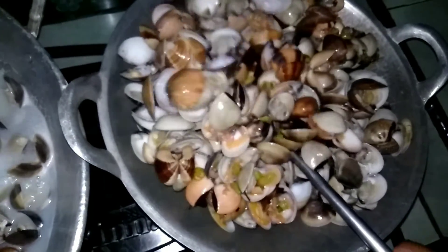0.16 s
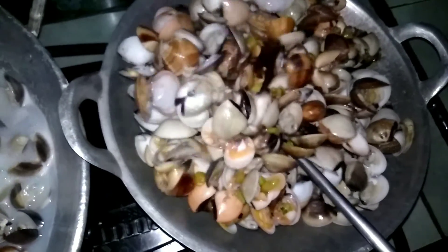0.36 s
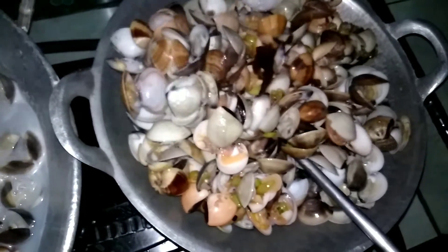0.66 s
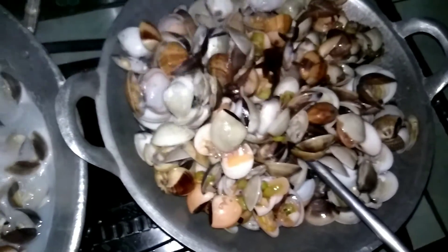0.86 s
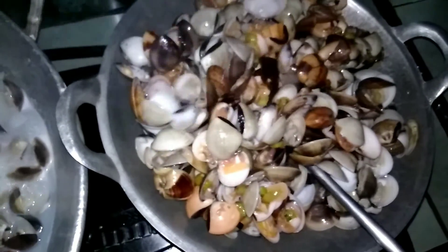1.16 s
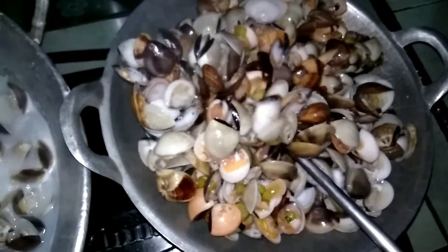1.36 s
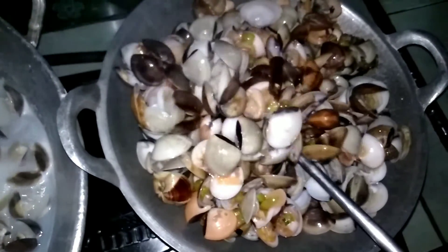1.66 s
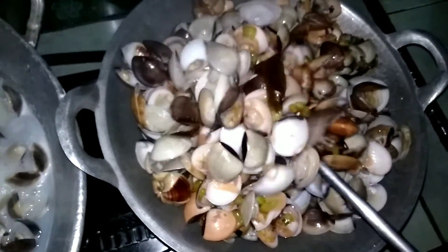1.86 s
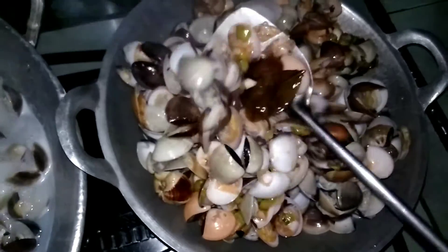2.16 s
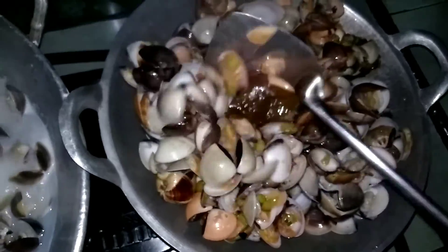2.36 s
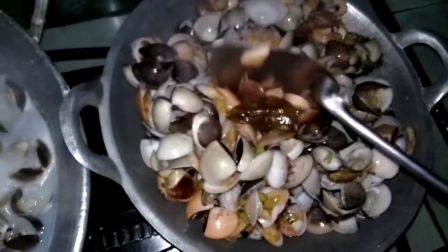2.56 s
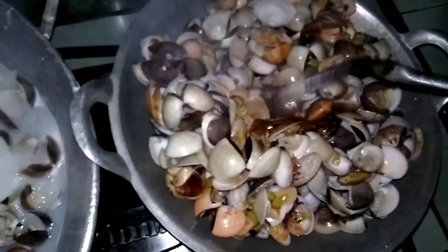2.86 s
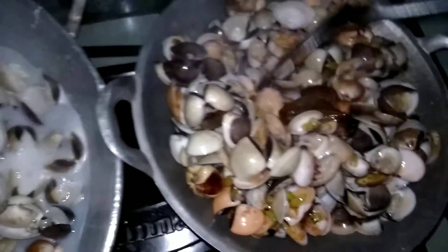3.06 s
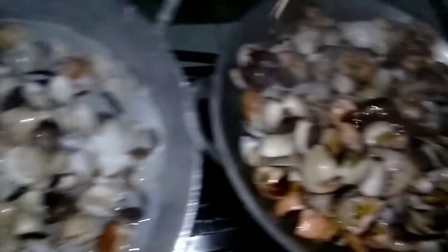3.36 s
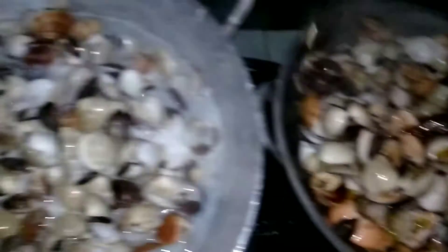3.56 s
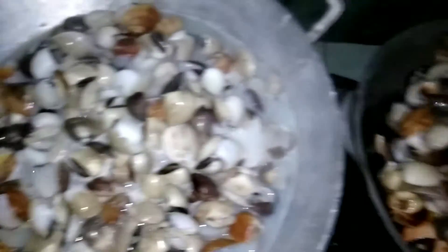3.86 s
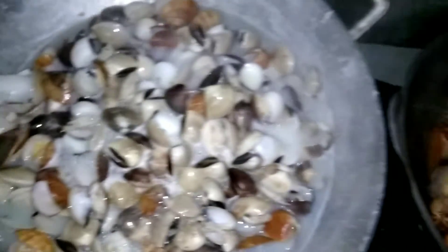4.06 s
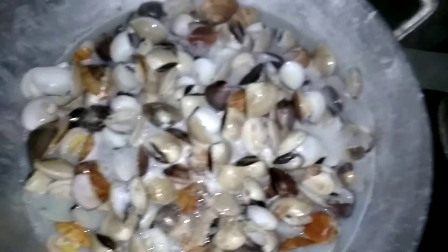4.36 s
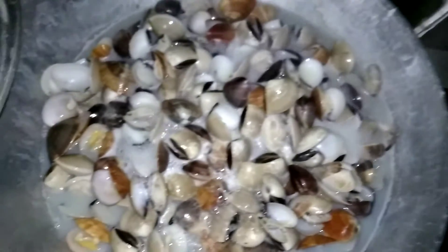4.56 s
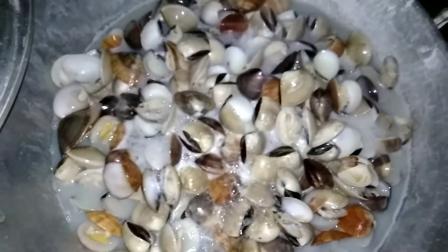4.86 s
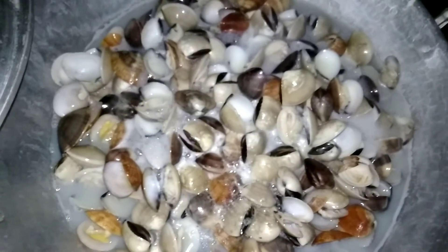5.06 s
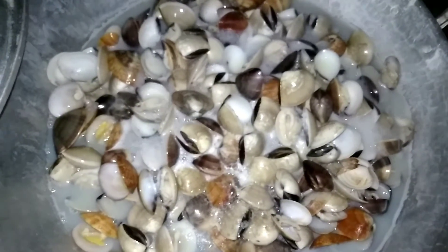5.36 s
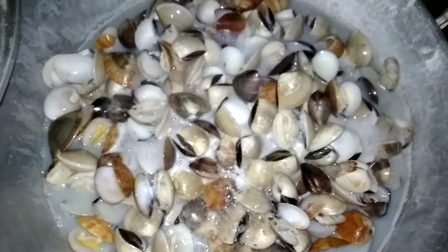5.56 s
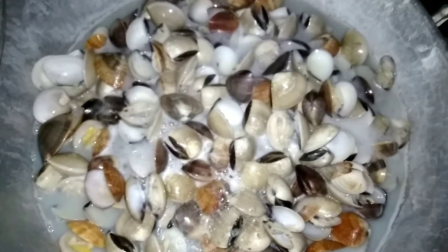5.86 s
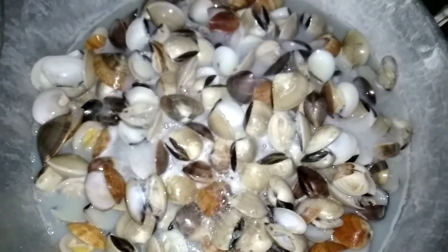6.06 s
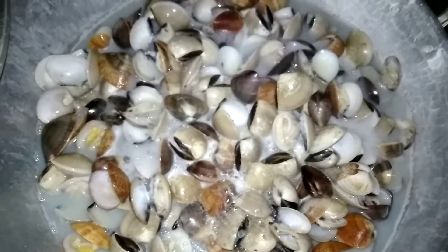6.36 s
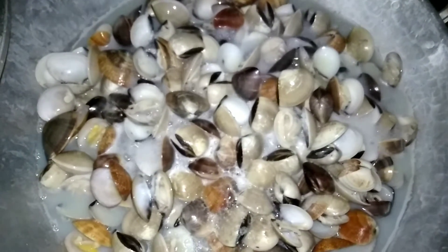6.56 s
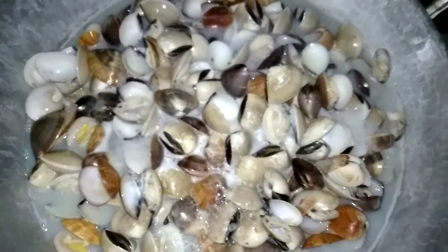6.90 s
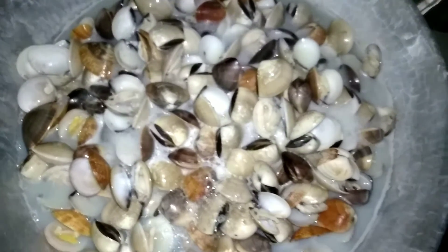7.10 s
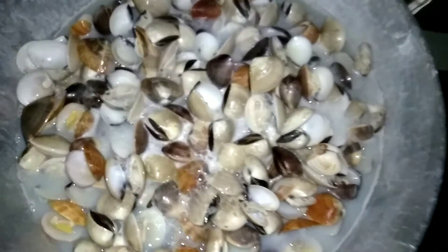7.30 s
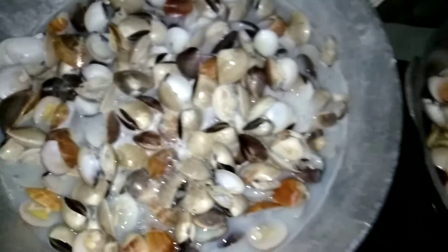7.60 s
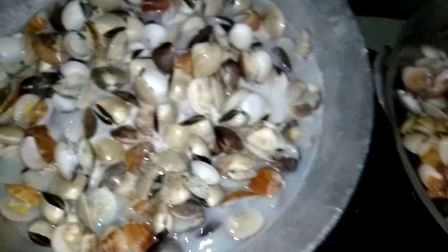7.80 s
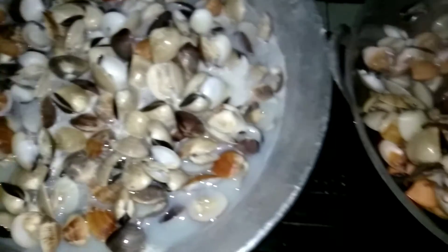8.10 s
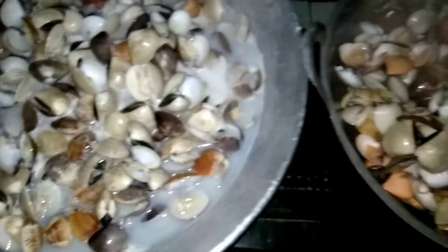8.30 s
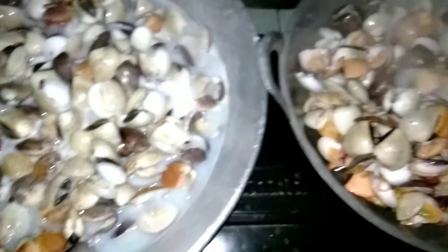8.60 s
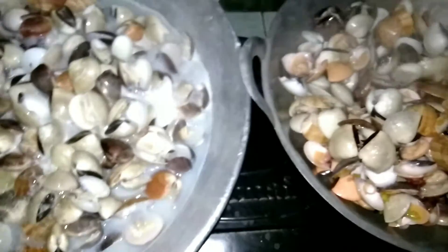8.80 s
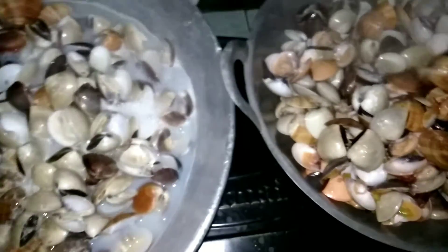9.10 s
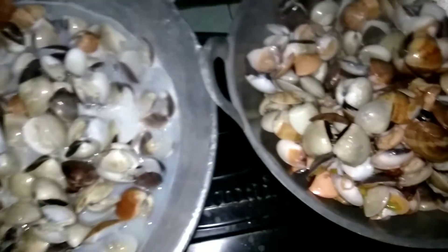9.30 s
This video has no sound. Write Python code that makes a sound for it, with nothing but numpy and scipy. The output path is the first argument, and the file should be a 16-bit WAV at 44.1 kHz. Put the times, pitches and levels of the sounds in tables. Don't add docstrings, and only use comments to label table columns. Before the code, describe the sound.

Clam shells clatter against each other and a steel pan as they are stirred, sparse at first, then dense, above a softly hissing burner.

```python
import sys
import numpy as np
from scipy import signal
from scipy.fft import rfft, irfft, next_fast_len
from scipy.io import wavfile
from scipy.ndimage import uniform_filter1d, map_coordinates

SR = 44100
rng = np.random.default_rng(int(sys.argv[2]) if len(sys.argv) > 2 else 0)


def wav_record(signal):
    frames = np.transpose(np.atleast_2d(signal))
    bounded = np.clip(frames, -1, 1)
    quanta = np.round(bounded * 32767).astype(np.int16)
    wavfile.write(sys.argv[1], SR, quanta)


def level_to_linear(level):
    exponent = np.asarray(level, float) / 20
    return 10 ** exponent


N = 416304


def unit(x):
    return x / np.sqrt(np.mean(x ** 2) + 1e-20)


def along(points, hz):
    f, v = np.transpose(points)
    return np.interp(np.log(hz + 1), np.log(f + 1), v)


def curves(rows):
    s, *columns = np.transpose(rows)
    return [np.interp(np.arange(N) / SR, s, column) for column in columns]


def filtered(x, response):
    m = next_fast_len(N + 8192)
    return irfft(rfft(x, m) * response(np.fft.rfftfreq(m, 1 / SR)), m)[..., :N]


def coloured(x, spectrum):
    size = 4096
    gain = level_to_linear(along(spectrum, np.fft.rfftfreq(size, 1 / SR)))
    cepstrum = irfft(np.log(gain / np.sqrt(np.mean(gain ** 2)) + 1e-4))
    cepstrum[1:size // 2] *= 2
    cepstrum[size // 2 + 1:] = 0
    impulse = irfft(np.exp(rfft(cepstrum)))
    return signal.oaconvolve(x, impulse[None], axes=1)[:, :N]


def strikes(s, db, hz, ring_t60, burst_t60, ring_db, length, rough, rise=0.00021, crack=1.18):
    t = np.arange(round(length * SR)) / SR
    draw = rng.standard_normal((len(s), 2, 8))
    chatter = rng.standard_normal((len(s), 2, len(t)))
    life = np.clip(np.reshape(burst_t60, (-1, 1, 1)), .004, .12)
    contact = crack * level_to_linear(-60 * t / .005)

    dull = np.clip(1.6 - 1.6 * hz / 8870, 0, 1)[:, None, None]
    body = chatter
    for _ in range(2):
        body = (body + dull * np.roll(body, 1, axis=2)) / np.sqrt(1 + dull ** 2)
    wave = body * (level_to_linear(-60 * (t / life) ** 1.6) + contact)

    fade = level_to_linear(ring_db - 60 * t / np.reshape(ring_t60, (-1, 1, 1)))
    shake = rough * np.cumsum(chatter, axis=2)
    for k, spread in enumerate((0, .08, .3)):
        mode_hz = np.clip(hz[:, None, None] * np.exp(spread * draw[:, :1, k, None]), 100, 15000)
        phase = 2 * np.pi * (mode_hz * t + draw[:, :, 5 - k, None]) + (-1) ** k * shake
        strength = level_to_linear(3.47 * draw[:, :, 3 + k, None] - 2.5 * k)
        wave += strength * fade * np.sin(phase)

    bounce_hz = 170 * np.exp(0.12 * draw[:, :1, 6:7])
    wave *= level_to_linear(13.2 * rough * np.cos(2 * np.pi * bounce_hz * t))
    wave *= 1 - np.exp(-t / rise)
    wave *= level_to_linear(db)[:, None, None] / np.abs(wave).max(axis=(1, 2), keepdims=True)
    at = (np.round(s * SR).astype(int)[:, None] + np.arange(len(t))).ravel()
    return np.array([np.bincount(at, wave[:, port].ravel(), N + len(t))[:N] for port in range(2)])


def tumbling(count, spread_db):
    draw = rng.random((count, 3))
    smallest = .02
    return draw[:, 0] * (N - 1) / SR, -spread_db * np.log(draw[:, 1] + smallest), draw[:, 2]


def patches(x, wide, long, gain, size=512):
    hz, _, z = signal.stft(x, SR, nperseg=size)
    field = rng.standard_normal(z.shape[1:])
    for _ in range(2):
        field = uniform_filter1d(uniform_filter1d(field, wide, 0), long, 1)
    return signal.istft(z * gain(unit(field), hz[:, None]), SR, nperseg=size)[1][:, :N]


# frequency in Hz, level in dB per Hz.
SHELL_TONE = [(710, -27), (1200, -14), (1480, -11.5), (1880, -11), (3330, -4.5), (3840, -2), (4990, -2.5),
              (12500, -4), (15300, -12), (16500, -12.5)]
# frequency in Hz, level in dB per Hz.
WOK_TONE = [(150, -7.5), (250, -13.5), (301, -12.5), (481, -7), (580, -3), (880, -1), (1040, -3),
            (1690, 0.5), (1900, -5), (3000, 0), (3900, -80), (6600, -120)]
# time in seconds, peak level in dB, time for the chatter to die by 60 dB in seconds.
BLADE_HITS = [(.1161, -33, 0.029), (1.9639, -24, 0.038), (2.0517, -25, 0.04), (3.6326, -25.5, 0.14),
              (5.673, -20, 0.036), (5.7168, -24.5, 0.07), (6.4336, -20.5, 0.022), (8.6308, -24, 0.14)]
LARGE_SHELLS = [(.5348, -34.5, 0.043), (.9526, -48, 0.15), (1.2503, -32.5, 0.084), (1.5396, -38, 0.028),
                (1.6871, -34.5, 0.071), (1.8155, -25.5, 0.031), (2.3231, -28, 0.049), (2.7006, -17, 0.027),
                (2.8983, -27, 0.096), (3.6452, -23, 0.085), (3.6662, -18.5, 0.076), (3.7726, -18, 0.18),
                (4.4338, -28.5, 0.071), (4.4613, -24.5, 0.11), (4.619, -24.5, 0.16), (4.7703, -29, 0.079),
                (5.288, -29, 0.021), (5.9078, -27, 0.097), (6.0432, -18.5, 0.17), (6.1064, -21, 0.052),
                (6.481, -20, 0.038), (6.9797, -25.5, 0.06), (7.1467, -21, 0.096), (7.3408, -17, 0.086),
                (7.7532, -19.5, 0.08), (8.2646, -30.5, 0.04), (8.969, -30.5, 0.11), (9.0296, -23.5, 0.11),
                (9.1003, -24.5, 0.053), (9.224, -33.5, 0.066), (9.383, -34.5, 0.047)]
MIDDLE_SHELLS = [(1.061, -27.5, 0.019), (1.1337, -17.5, 0.017), (1.4711, -30.5, 0.076),
                 (1.9038, -22.5, .04), (1.925, -26.5, 0.058), (2.0862, -23, 0.1), (2.1931, -26, 0.049),
                 (2.2482, -24, 0.15), (2.398, -27, 0.071), (2.4326, -30, .076), (2.505, -21.5, .019),
                 (2.5467, -28.5, .066), (2.872, -27, .064), (3.5735, -28, 0.18), (3.7448, -17, 0.15),
                 (4.2564, -26, 0.024), (4.2927, -25.5, 0.11), (4.4008, -28, 0.024), (4.8673, -21, 0.14),
                 (4.9057, -25, 0.078), (5.2213, -33, 0.23), (5.7259, -19.5, 0.14), (6.0116, -26, 0.17),
                 (6.9464, -34, 0.04), (7.0708, -28, 0.052), (7.2758, -29.5, 0.043), (7.4624, -25, 0.11),
                 (7.857, -21, 0.25), (8.0698, -23, 0.09), (8.8897, -34, 0.045)]
SMALL_SHELLS = [(.0618, -25, 0.031), (.2448, -33, 0.16), (.4813, -33, 0.14), (1.1872, -25, 0.043),
                (1.3803, -22, 0.035), (2.576, -28, 0.062), (3.5079, -25.5, 0.064), (3.8194, -25, 0.18),
                (4.1447, -30, 0.19), (4.3254, -21, 0.036), (4.525, -24, 0.08), (4.5915, -22, 0.13),
                (4.6865, -20.5, 0.056), (4.7167, -22.5, 0.13), (4.809, -22.5, 0.27), (4.9316, -30, 0.038),
                (5.0513, -18, 0.019), (5.069, -25.5, 0.03), (5.5644, -20.5, 0.054), (5.7579, -15.5, 0.14),
                (6.3913, -26.5, 0.036), (7.1205, -17, 0.092), (7.1715, -26, 0.057), (7.6063, -16.5, 0.047),
                (7.683, -24.5, 0.053), (8.031, -26, 0.11), (8.4473, -29, 0.061), (8.4972, -28, 0.16),
                (8.6009, -23.5, 0.072), (9.195, -36, 0.092)]
# time in seconds, peak level in dB.
EDGE_SNAPS = [(0.0972, -39), (0.159, -31.5), (0.3642, -33), (1.949, -30), (2.1087, -34), (2.236, -23.5),
              (2.355, -30), (2.664, -33), (2.955, -31), (3.9554, -50), (4.358, -28), (4.373, -25.5),
              (4.498, -25.5), (4.7496, -22), (4.954, -27), (5.119, -32.5), (6.546, -36.5), (7.097, -23),
              (7.471, -23), (7.654, -29), (7.7152, -39), (7.844, -24.5), (7.8851, -21), (7.982, -31),
              (8.431, -33), (8.56, -21.5), (8.6897, -28.5), (8.745, -32.5), (8.905, -30)]
# time in seconds, peak level in dB, ring of the wok in Hz.
WOK_KNOCKS = [(.242, -31, 1010), (1.131, -40, 1250), (1.199, -34.5, 1110), (1.695, -33, 714),
              (1.813, -34, 1247), (1.965, -22, 695), (2.05, -27, 747), (2.204, -32.5, 1340),
              (2.7, -36, 540), (2.903, -35, 1760), (3.505, -40, 1370), (3.665, -40, 1490),
              (3.743, -29.5, 1520), (4.463, -36, 910), (5.566, -29.5, 915), (5.766, -29, 1530),
              (6.036, -29.5, 883), (6.104, -26.5, 898), (6.436, -28, 900), (6.482, -33, 870),
              (6.766, -33, 715), (7.148, -29, 895), (7.63, -31.5, 1395), (8.042, -32, 1450),
              (8.6, -29, 728), (8.629, -27.5, 1724), (8.889, -34, 696), (8.969, -31.5, 1720),
              (9.028, -25, 860), (9.101, -33.5, 1550)]
# time in seconds, peak level in dB, pitch in Hz.
FLOOR_THUDS = [
    (1.9645, -25, 608),
    (2.697, -35.5, 494),
    (5.562, -40, 450),
    (5.942, -53, 430),
    (5.999, -33.5, 284),
    (6.047, -31, 426),
    (6.762, -33, 388),
    (6.792, -30.5, 429),
    (7.145, -37.5, 422),
]


def clacks():
    snaps = [(s, db, 0.035) for s, db in EDGE_SNAPS]
    sizes = ((BLADE_HITS, 2350), (LARGE_SHELLS, 4050), (MIDDLE_SHELLS, 7290), (SMALL_SHELLS, 8590),
             (snaps, 7380))
    s, db, life, hz = np.transpose([(*row, ring_hz) for rows, ring_hz in sizes for row in rows])
    hz = hz * np.exp(0.0675 * rng.standard_normal(len(s)))
    ring = np.minimum(.8 * life, 0.038)
    shell = strikes(s, db + 5.0, hz, ring, life, ring_db=1.5, length=.08, rough=.1)

    s, db, hz = np.transpose(WOK_KNOCKS)
    wok = strikes(s, db - 0.5, hz, .055, 0.066, ring_db=2.0, length=.05, rough=0.048)

    s, db, hz = np.transpose(FLOOR_THUDS)
    thuds = strikes(s, db, hz, 0.08, 0.023, ring_db=35, length=0.1, rough=0.06)
    return coloured(shell, SHELL_TONE) + coloured(wok, WOK_TONE) + thuds


# time in seconds, peak level in dB, ring in Hz.
GLANCING_TICKS = [(0.215, -29, 6800), (0.264, -24.5, 8160), (1.0157, -25, 6040), (1.0227, -27, 10300),
                  (1.176, -24, 2380), (1.2003, -27, 5240), (1.499, -27, 3030), (1.5397, -30, 9900),
                  (1.993, -25, 4880), (2.217, -25, 2550), (2.266, -20, 7730), (2.2803, -18, 6880),
                  (2.3087, -20.5, 9050), (2.5771, -30, 5600), (2.6829, -33, 7740), (3.4054, -32.5, 12650),
                  (3.954, -30, 4150), (4.126, -26.5, 8060), (4.197, -21, 9740), (4.3376, -16, 8260),
                  (4.4, -16.5, 7540), (4.539, -9.5, 14500), (4.554, -12.5, 7830), (4.563, -18, 5500),
                  (4.646, -24, 11300), (4.833, -16, 14400), (4.839, -19, 5640), (4.93, -13.5, 8270),
                  (4.9657, -35, 5530), (5.0336, -36, 5380), (5.2441, -24, 13700), (5.262, -30, 8590),
                  (5.744, -17.5, 4620), (5.83, -17.5, 3790), (6.0236, -19, 4740), (6.384, -28, 9540),
                  (6.5535, -30, 4500), (6.8923, -34, 7350), (7.05, -21, 3700), (7.1462, -13, 3860),
                  (7.17, -15, 8450), (7.3253, -45, 4860), (7.4251, -36, 10700), (7.491, -20.5, 8300),
                  (7.5179, -23, 6990), (7.534, -25, 7100), (7.7334, -11.5, 14360), (7.927, -18.5, 7240),
                  (7.989, -18.5, 7310), (8.359, -31, 12410), (8.37, -28, 6820), (8.457, -18, 9400),
                  (8.505, -16, 9570), (8.5252, -14, 7500), (8.671, -20, 12750), (8.713, -27, 4310),
                  (8.812, -28.5, 6700), (9.037, -16, 4050), (9.1003, -15.5, 4470)]
# time in seconds, peak level in dB, wok ring in Hz.
WOK_TAPS = [(0.2963, -39.5, 690), (0.435, -39, 568), (0.6126, -39.5, 1410), (0.886, -37.5, 1140),
            (2.0862, -30.5, 730), (2.2443, -35, 1270), (2.4437, -33, 1364), (2.8788, -35, 1700),
            (2.9022, -30.5, 1810), (4.1326, -41, 880), (4.194, -32.5, 1650), (4.218, -34, 1585),
            (4.7743, -33.5, 1430), (5.5653, -26.5, 875), (5.854, -35, 1470), (6.011, -37, 1590),
            (6.2199, -40, 865), (6.5512, -38.5, 870), (6.8883, -37.5, 1640), (7.1068, -33, 580),
            (7.471, -34, 1680), (7.9789, -44, 706), (8.0863, -32, 1390), (8.1155, -38.5, 880),
            (8.4432, -33.5, 725), (8.798, -38.5, 560), (9.224, -37.5, 630),
            (0.6994, -43, 560), (0.7523, -45, 530), (0.7994, -42, 1050), (0.923, -40, 940.0),
                 (1.0147, -36, 740), (1.1311, -29.5, 1290), (1.2689, -36, 1130), (1.8458, -36, 695),
                 (2.1451, -31.5, 1360), (2.5524, -35, 1210), (2.8116, -41.0, 720), (3.0115, -42, 710),
                 (3.067, -41, 715), (3.515, -33.5, 1290), (5.7682, -30.5, 1830), (6.0467, -31, 900),
                 (6.1913, -37, 880), (6.9811, -32, 810.0), (7.6064, -30, 1220), (7.6576, -32, 706),
                 (8.2673, -38.5, 702), (9.3537, -42, 716)]
# time in seconds, peak level in dB, ring in Hz.
REBOUNDS = [(0.2559, -37, 8000), (0.3128, -30, 9900), (0.4535, -43, 4070.0), (1.0541, -38.0, 3460.0),
            (1.2796, -36, 4130.0), (1.3584, -33, 3710.0), (1.4516, -27, 2770), (1.471, -21.5, 6080),
            (1.9286, -20, 10100), (2.068, -18, 2280), (2.1257, -21, 3320), (2.1456, -23, 12660.0),
            (2.193, -21, 5870), (2.1985, -17, 6140), (2.435, -20, 5900), (2.4529, -23.5, 5960),
            (2.607, -30.5, 2410.0), (2.905, -21, 7300.0), (3.5784, -19.5, 4250), (3.8095, -18, 10500),
            (4.3007, -17, 7440), (4.3177, -22, 8870.0), (4.4364, -20.0, 10730.0), (4.4664, -12, 4020),
            (4.5152, -23, 13000), (4.5242, -21, 12700), (4.7487, -25, 7920.0), (4.7717, -19, 11200),
            (4.8914, -22, 10500), (5.5639, -18, 10440), (5.8205, -20, 4500), (5.8407, -20, 3900),
            (5.8906, -21, 2230.0), (5.958, -27, 3100), (6.0098, -33, 4660), (6.9354, -22, 6740.0),
            (6.9477, -23, 6540.0), (7.1035, -15, 14700), (7.341, -20, 10630), (7.3468, -21, 8400),
            (7.358, -19, 5700), (7.4625, -21.5, 7240), (7.5876, -21, 8950.0), (7.6471, -29.0, 6970.0),
            (7.6581, -28.0, 6000.0), (7.716, -27.0, 7290.0), (7.9794, -34, 5100), (8.0418, -14.5, 7750),
            (8.121, -27.5, 3420), (8.2088, -32, 8000), (8.4463, -29, 4590.0), (8.4852, -33, 4350.0),
            (8.499, -19, 7730), (8.5531, -24, 7600), (8.689, -21.0, 8100), (8.7915, -38.0, 4400),
            (9.195, -21.5, 8400)]
# time in seconds, peak level in dB.
EDGE_CRACKS = [(1.1335, -20), (1.3812, -23), (1.9642, -18), (2.0521, -15), (2.0865, -18), (4.3262, -24),
               (8.0316, -20), (8.8895, -26), (2.6655, -31), (4.4014, -21), (7.1492, -15.5), (7.2757, -31),
               (7.4735, -18)]


def touches():
    s, db, hz = np.transpose(GLANCING_TICKS)
    ticks = strikes(s, db - 4.0, hz, 0.049, 0.034, ring_db=5.0, length=0.027, rough=0.102,
                    rise=0.00046, crack=.3)
    s, db, hz = np.transpose(REBOUNDS)
    rebounds = strikes(s, db - 1.5, hz, 0.025, 0.027, ring_db=10.0, length=0.022, rough=0.069,
                       rise=0.00044, crack=1.1)
    s, db, hz = np.transpose(WOK_TAPS)
    taps = strikes(s, db - .5, hz, .035, .035, ring_db=-2, length=.05, rough=.06, rise=0.0012, crack=.3)

    s, db = np.transpose(EDGE_CRACKS)
    crack_hz = np.full(len(s), 5200.0)
    cracks = strikes(s, db, crack_hz, .004, .006, ring_db=-6, length=.006, rough=.1)
    return coloured(ticks + rebounds, SHELL_TONE) + coloured(taps, WOK_TONE) + cracks


# time in seconds, peak level in dB, pitch in Hz,
# time to die by 60 dB in seconds.
STEEL_RINGS = [
    (2.901, -23, 1765, 0.06),
    (5.605, -35, 2630, 0.12),
    (6.435, -15.5, 2485, 0.026),
    (8.976, -41, 690, 0.33),
    (9.031, -33.5, 1570, 0.27),
]


def steel():
    t = np.arange(N) / SR
    rings = np.zeros(N)
    shake = .012 * np.cumsum(rng.standard_normal(N))
    for s, db, hz, t60 in STEEL_RINGS:
        fade = (t > s) * level_to_linear(db - 60 * np.abs(t - s) / t60)
        rings += fade * np.sin(2 * np.pi * hz * t + shake)
    return rings * np.array([[1], [0]])


# start in seconds, hold in seconds,
# level of the rattle in dB, level of the scrape on the wok in dB.
SPATULA_PUSHES = [(0.12, 0.026, -41, -41), (0.256, 0.24, -43.5, -50), (0.607, 0.38, -57, -57.5),
                  (0.959, 0.078, -41.5, -56), (1.147, 0.43, -45, -50), (1.899, 0.45, -40.5, -48),
                  (2.415, 0.36, -50.5, -55), (2.897, 0.079, -48, -56), (3.547, 0.1, -42, -46.5),
                  (3.701, 0.14, -38.5, -42), (3.97, 0.27, -44.5, -49), (4.302, 0.34, -37, -49),
                  (4.704, 0.2, -37, -45.5), (5.003, 0.045, -39.5, -67), (5.26, 0.039, -68, -53.5),
                  (5.605, 0.021, -46.5, -54), (5.729, 0.39, -36, -42.5), (6.357, 0.2, -48.5, -68),
                  (6.842, 0.073, -45, -50.5), (6.946, 0.21, -34.5, -41.5), (7.218, 0.33, -45, -52),
                  (7.604, 0.16, -36.5, -44.5), (7.862, 0.13, -34.5, -40.5), (8.225, 0.094, -48, -52),
                  (8.411, 0.26, -39, -49), (8.706, 0.061, -45, -51), (8.923, 0.31, -52, -55),
                  (9.36, 0.025, -56, -56.5)]


def sliding():
    rise, settle = 219, 196
    resting_db = (-59, -64)
    start, hold, *levels = np.transpose(SPATULA_PUSHES)
    t = np.arange(0, N + 64, 64)[:, None] / SR
    loss_db = np.maximum(0, np.maximum(rise * (start - t), settle * (t - start - hold)))
    gains = []
    for db, rest_db in zip(levels, resting_db):
        power = level_to_linear(2 * rest_db) + level_to_linear(2 * (db - loss_db)).sum(axis=1)
        gains.append(np.interp(np.arange(N) / SR, t[:, 0], np.sqrt(power)))
    return gains


def rattle():
    shell_gain, steel_gain = sliding()
    s, db, u = tumbling(count=5200, spread_db=1.9)
    ticks = strikes(s, db, 2500 * 4.5 ** u, .018, .011, ring_db=2.5, length=.008, rough=.07,
                    rise=.0003, crack=1.2)
    ticks = patches(coloured(ticks, SHELL_TONE), 6, 5, lambda field, hz: level_to_linear(2.1 * field))

    s, db, u = tumbling(count=1800, spread_db=2.0)
    scrape = strikes(s, db, 500 * 3.0 ** u, 0.098, 0.049, ring_db=-22.5, length=.016, rough=0.05)
    return shell_gain * unit(ticks) + steel_gain * unit(coloured(scrape, WOK_TONE))


# time in seconds, level of the roar in dB, level of the droning wok in dB.
FLAME_LEVELS = [
    (0.0, -54, -47.5),
    (7.31, -53.5, -57.5),
    (7.73, -56.5, -52.5),
    (9.44, -54, -57),
]
# frequency in Hz, level in dB per Hz.
ROAR_TONE = [(18, -48), (30, -40), (50, 1), (67, -1), (82, -10.5), (99, 3), (111, -1), (132, -2), (167, -9),
             (214, -7.5), (228, -7.5), (244, -23.5), (302, -14.5), (330, -16), (430, -18.5), (730, -120)]
# frequency in Hz, level in dB per Hz.
HISS_TONE = [(160, -21), (280, -16), (459, -35.5), (517, 8.5), (593, -33), (703, 5), (834, -45),
             (1190, -14), (1960, -14.5), (8200, -8), (9720, -7.5), (14900, -7), (16500, -51)]


def burner():
    roar_db, drone_db = curves(FLAME_LEVELS)
    roar = unit(coloured(rng.standard_normal((2, N)), ROAR_TONE))
    hiss = coloured(rng.standard_normal((2, N)), HISS_TONE)

    mode = lambda f: 1j * f * 60 / (702 ** 2 - f * f + 1j * f * 60)
    drone = unit(filtered(rng.standard_normal((2, N)), mode))
    flicker = map_coordinates(rng.standard_normal(200), [np.arange(N) * 12 / SR])
    drone *= level_to_linear(1.8 * flicker)

    s, db, u = tumbling(count=1500, spread_db=2.5)
    blips = unit(strikes(s, db, 550 * 3 ** u, 0.04, 0.015, ring_db=7, length=0.02, rough=0.03))
    return level_to_linear(roar_db + 2.5) * roar + level_to_linear(-55.0) * hiss + level_to_linear(drone_db - 9) * drone + level_to_linear(-57.0) * blips


# frequency in Hz, time to die by 60 dB in seconds.
ROOM_DECAY = [(300, 0.65), (2000, 0.52), (10000, 0.12)]


def kitchen(x):
    out, step = np.zeros((2, N + 2 * SR)), SR // 4
    for at in range(0, N, step):
        hz, t, z = signal.stft(rng.standard_normal((2, SR // 4)), SR, nperseg=256)
        fade = level_to_linear(-60 * t / along(ROOM_DECAY, hz)[:, None])
        tail = signal.istft(z * fade, SR, nperseg=256)[1]
        wet = signal.fftconvolve(x[:, at:at + step], tail / np.linalg.norm(tail[0]), axes=1)
        first = at + 200
        out[:, first:first + wet.shape[1]] += wet
    return out[:, :N]


# frequency in Hz, likeness of left and right (1 is the same).
PORT_LIKENESS = [(60, 0.96), (130, 1), (290, 0.91), (640, 0.72), (1410, 0.49), (3100, -0.11), (6820, 0.042),
                 (15000, -0.072)]


def paired(pair):
    turn = lambda hz: np.arccos(np.clip(along(PORT_LIKENESS, hz), -1, 1)) / 2
    mid, side = filtered(pair, lambda hz: np.array([np.cos(turn(hz)), np.sin(turn(hz))]))
    return np.array([mid + side, mid - side])


# time in seconds, lag of the left port in samples, gain of the right in dB.
CAMERA_SWING = [
    (0, -7, -0.5),
    (2.8, 1, 0),
    (3.6, 7, 0.5),
    (4.4, 13, 1.5),
    (7.8, 13, 1),
    (8.6, 3, 0.9),
    (9.44, 10.5, -0.4),
]


def scene():
    lag, right_db = curves(CAMERA_SWING)
    shells = clacks() + touches() + rattle() + steel()
    left, right = paired(shells + level_to_linear(-14) * kitchen(shells))
    left = map_coordinates(left, [np.arange(N) - lag], mode="nearest")
    wok = np.array([left * level_to_linear(-right_db), right * level_to_linear(right_db)])
    return wok + paired(burner())


def band_limit(x):
    return signal.sosfilt(signal.butter(12, 16790, fs=SR, output="sos"), x)


# frequency in Hz, left minus right in dB.
PORT_TONE = [(60, 1), (110, 0.5), (200, -0.5), (380, 0.5), (700, -2.5), (1290, -4), (2380, 1.5), (4400, 0),
             (8120, -2.5), (15000, -14)]


def record(dry):
    def ports(hz):
        bass_cut = (hz ** 2 / (hz ** 2 + 40 ** 2)) ** 2
        treble_loss_db = np.clip(.012 * (hz - 15500), 0, 9) + np.clip(.2 * (hz - 16700), 0, 80)
        return level_to_linear(np.outer([.5, -.5], along(PORT_TONE, hz))) * bass_cut * level_to_linear(-treble_loss_db)

    return band_limit(filtered(dry, ports))


dry = scene()
out = record(dry)
wav_record(out)
```